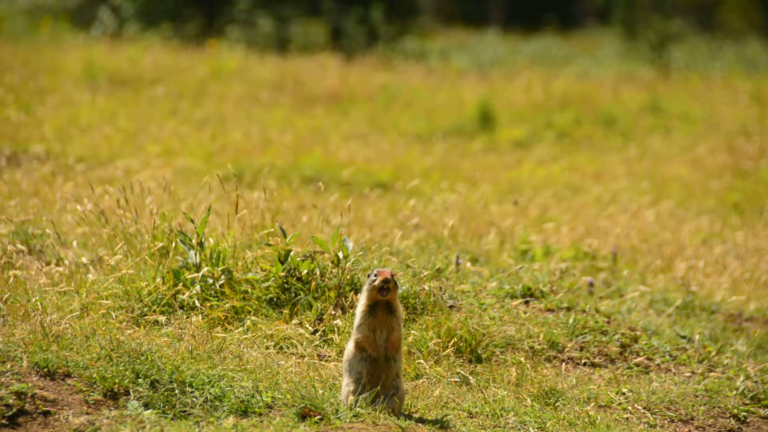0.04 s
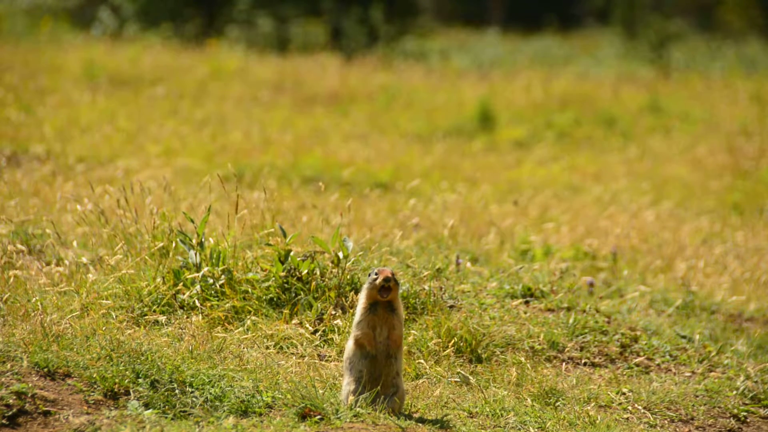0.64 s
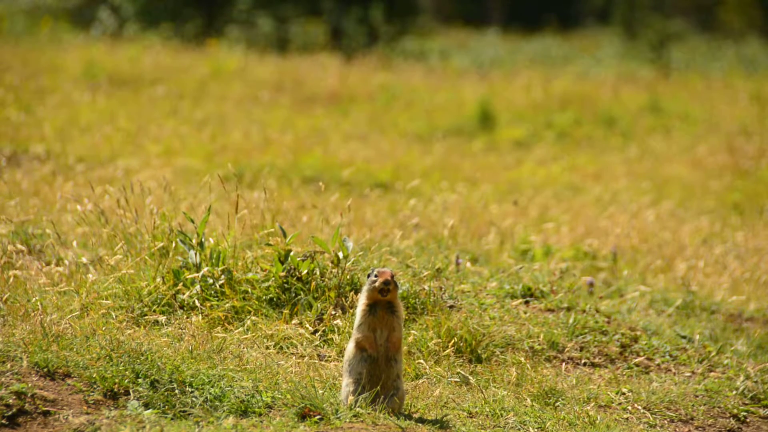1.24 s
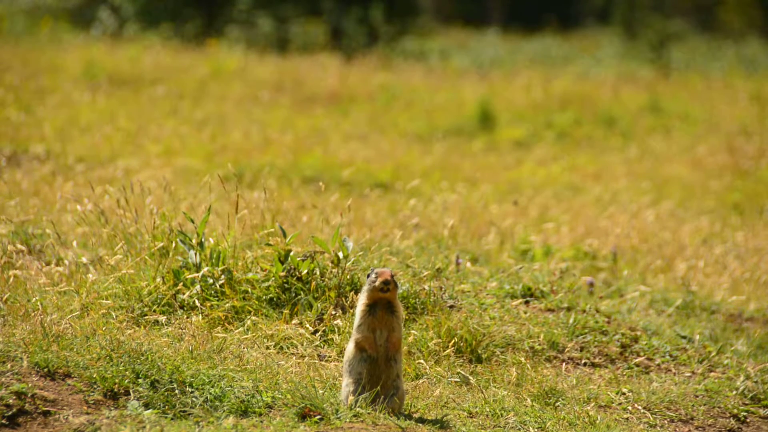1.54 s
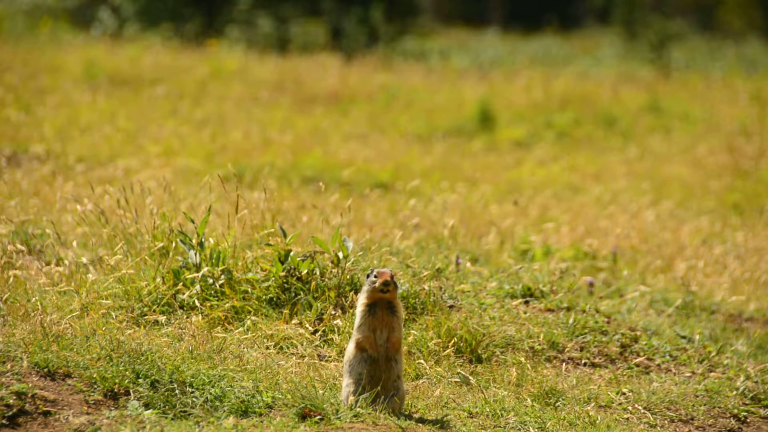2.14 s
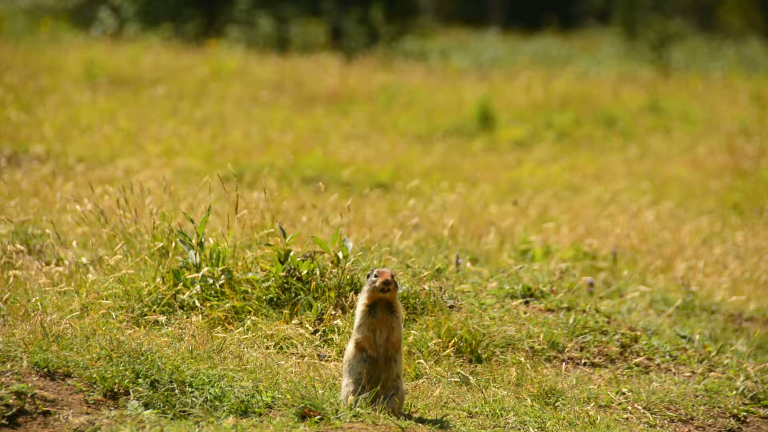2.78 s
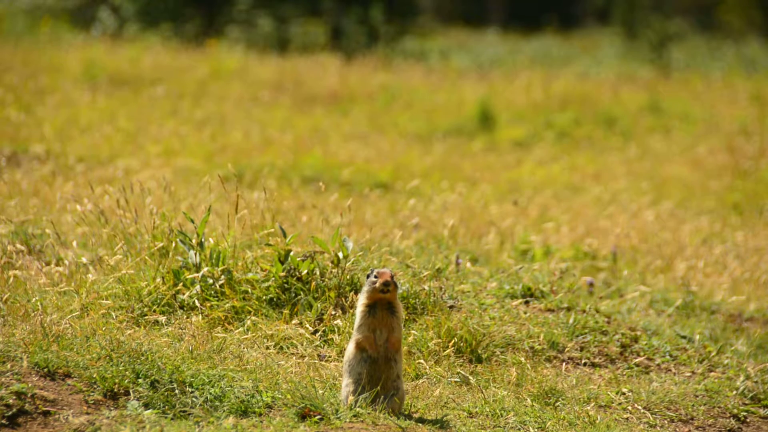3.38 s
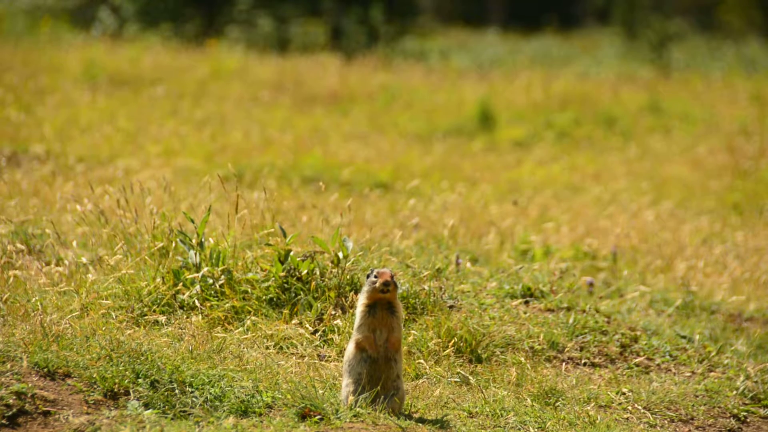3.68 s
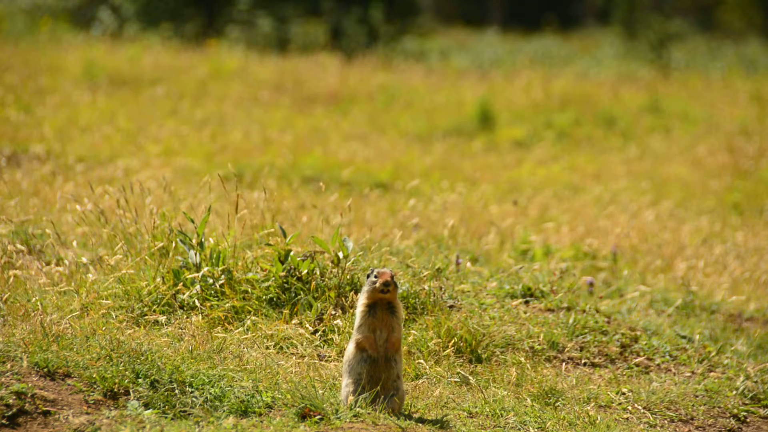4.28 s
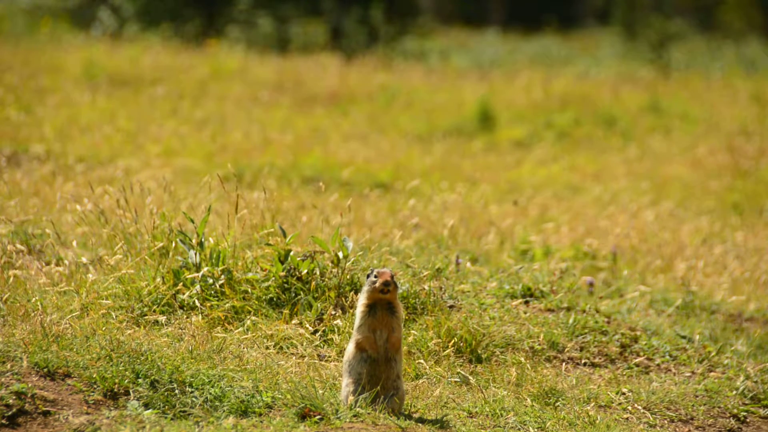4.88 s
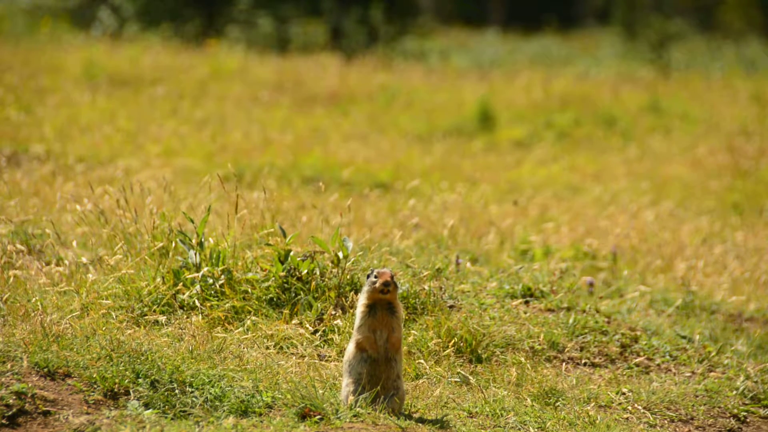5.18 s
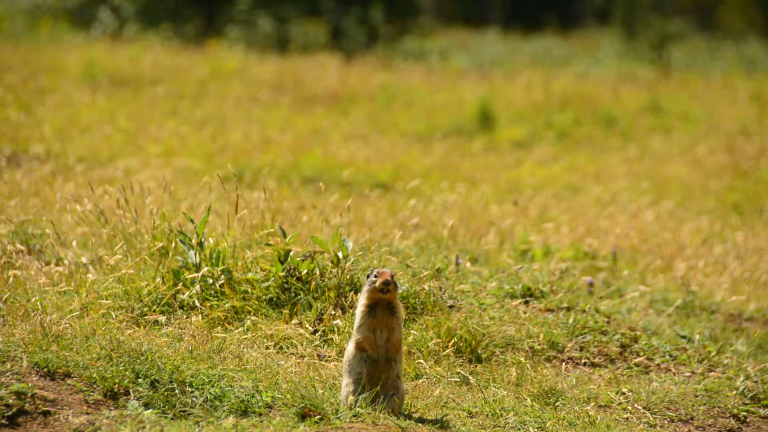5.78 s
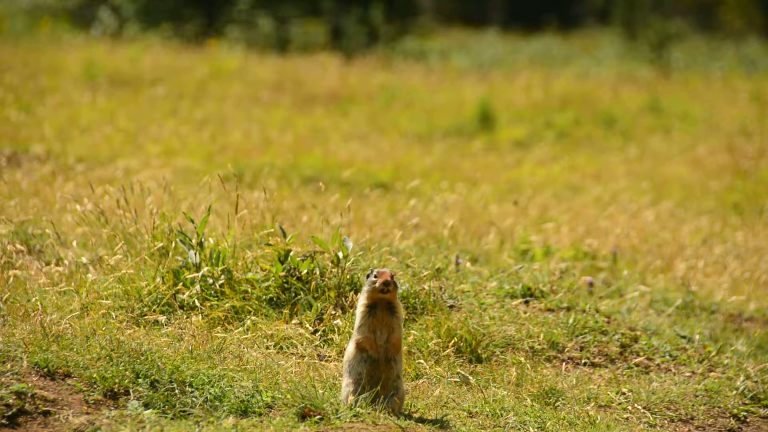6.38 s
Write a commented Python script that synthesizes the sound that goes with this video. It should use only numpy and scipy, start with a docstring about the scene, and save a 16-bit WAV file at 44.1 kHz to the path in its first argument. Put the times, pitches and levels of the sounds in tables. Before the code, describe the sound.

A ground squirrel gives six sharp, high alarm chirps from straight ahead in an open meadow, each a tiny falling whistle with a brief outdoor echo. Three come in quick succession, then three more after longer pauses. Between them are a small dry snap, faint grass rustles, soft microphone bumps and a light woody knock. Distant trees rush quietly underneath, with a thin electronic whine.

```python
"""Six sharp alarm chirps from a ground squirrel ring out over a meadow. Each is an arched whistle that
plunges at the end; near the crest a brief second whistle joins and couples with it. Grass and bushes
scatter the chirps and the forest edge answers, duller as the air soaks up the treble.
Behind them sit a dry snap, a woody knock, faint rustles, soft microphone bumps, brushed grass and a
far peep, on a bed of distant trees and the thin whine of camera electronics."""
import sys
import numpy as np
from scipy import signal
from scipy.fft import rfft, irfft, next_fast_len
from scipy.io import wavfile
from scipy.ndimage import map_coordinates

SR = 44100
rng = np.random.default_rng(int(sys.argv[2]) if len(sys.argv) > 2 else 0)


def put_to_file(sound):
    """Save the sound as 16-bit audio at rate SR, in the file named by the first command-line argument."""
    columns = np.atleast_2d(sound).T  # one column per channel
    safe = np.clip(columns, -1, 1)
    whole_steps = np.round(safe * 32767)
    wavfile.write(sys.argv[1], SR, whole_steps.astype(np.int16))


N = 283563

# The alarm calls. Each row: start in seconds, length in seconds, crest pitch in Hz, then trims in dB
# for the whole chirp, the second harmonic, the third harmonic and the second whistle.
CHIRPS = [(0.0552, 0.058, 4672, 1, 2, 0, -0.5), (0.718, 0.063, 4620, -0.5, 1, -0.5, -1),
          (1.3903, 0.061, 4617, 0, 0.5, 0.5, -0.5), (2.5699, 0.06, 4618, 0.5, -0.5, -0.5, 0),
          (4.5307, 0.0615, 4656, 0, -1.5, 1.5, -6), (5.631, 0.06, 4646, 0, -2, 0.5, -4)]
# Throat and mouth resonances that the harmonics sweep through. Each row: frequency in Hz, gain in dB.
THROAT = [(2700, -36.5), (3400, -37.5), (3950, -17.5), (4300, -15), (4650, -18.5), (5500, -40),
          (6800, -21.5), (7900, -34), (8950, -25), (9300, -27), (10400, -50.5), (11500, -35.5),
          (12700, -34), (14000, -38)]
# Tones from the two whistles coupling. Each row: multiple of the first pitch, multiple of the second.
COUPLING_TONES = [(1, 1), (0, 2), (-1, 2), (3, -1), (4, -1)]
# Each entry: level of one coupling tone in dB, relative to the second whistle.
COUPLING_DB = [-11.5, -12.5, -19.5, -21, -17.5]
# Bushes and tufts that throw the chirps back. Each row: delay in seconds, spread in seconds,
# relative level in dB, lean to the left in dB.
BUSHES = [(.0062, .003, -18, -1), (.0278, .0014, -17, -4.5), (.031, .005, -18.5, -4), (.041, .002, -23, 0)]
# EQ on the meadow's reflections. Each row: frequency in Hz, gain in dB.
ECHO_COLOUR = [(2500, 10.5), (4500, 4.5), (6500, -1.5), (9200, 4), (13000, -2)]
# Stereo image of the reflections. Each row: frequency in Hz, left-right likeness (1 is mono).
ECHO_LIKENESS = [(2000, 1), (4300, 0.7), (9000, -.1), (14000, 0.025)]
# The snap's bright resonance. Each row: frequency in Hz, relative level in dB.
SNAP_COLOUR = [(150, -51), (300, -34), (500, -19), (1200, -23), (2300, -19.5), (2900, -28), (4300, -14),
               (5200, -13.5), (6100, -2.5), (7300, -24.5), (9300, -25), (10600, -17.5), (12500, -33),
               (15000, -45)]
# Scuffs and ticks. Each row: start in seconds, time to fall 60 dB in seconds, then the relative
# levels of the low, middle and high band in dB.
RUSTLES = [(2.279, .035, -62, -47, -62), (2.929, 0.042, -55, -47, -74.5), (3.623, .025, -61, -41, -48),
           (3.636, .2, -52.5, -51, -60), (4.764, .14, -44, -52.5, -57.5), (4.851, .14, -56, -42, -55.5),
           (4.858, .06, -52, -47, -63), (5.1532, .014, -58, -52, -43.5), (5.166, .1, -50, -57, -51.5),
           (5.249, .3, -54, -62, -60), (5.397, .03, -64, -50, -54.5), (5.549, 0.044, -53, -51, -56.5),
           (6.103, 0.027, -67, -45.5, -56), (6.133, 0.037, -57, -47, -47.5)]
# Colours of the low, middle and high rustle band. Each point: frequency in Hz, relative level in dB.
RUSTLE_BANDS = [
    [(80, -27), (300, -11), (700, -5.5), (1500, -27), (5000, -57)],
    [(400, -41), (1100, -4), (2600, 5), (4500, -10), (12000, -42)],
    [(2000, -25), (5000, 0), (11000, -5.5), (15000, -12.5)],
]
# Microphone bumps. Each row: centre in seconds, half length in seconds, level in dB,
# lower edge in Hz, upper edge in Hz.
BUMPS = [(2.113, 0.036, -66.5, 64, 140), (2.23, 0.02, -68, 65, 138), (2.52, .03, -60, 140, 450),
         (3.14, 0.11, -66, 55, 139.6), (3.196, 0.017, -52.5, 60, 151), (3.559, 0.0346, -52, 125, 360),
         (3.67, 0.064, -59.5, 110, 520), (4.828, 0.0062, -50.5, 190, 600)]
# Brushed grass. Each row: centre in seconds, half length in seconds, level in dB.
SWISHES = [(2.62, .04, -54), (3.619, .06, -57), (5.29, .04, -65.5), (5.847, .06, -63), (6.34, .05, -58)]
# The rush of distant trees. Each row: frequency in Hz, relative level in dB.
TREE_COLOUR = [(15, -59.5), (25, -33.5), (86, -16), (175, -11), (297, -5.5), (689, -2), (851, -4),
               (1200, -4.5), (1780, -7), (2500, -11.5), (3170, -13), (4020, -15), (4710, -16.5),
               (6460, -18), (13500, -20)]
# Open-air stereo image, widest in the treble. Each row: frequency in Hz, left-right likeness.
AIR_LIKENESS = [(60, .55), (150, 0.72), (400, .94), (1000, 0.89), (2400, .62), (6000, .2), (14000, .1)]
# The whine's fader, steady until it wavers near the end. Each row: time in seconds, then the relative
# left and right levels in dB.
WHINE_LEVELS = [(5.0, -48, -44.5), (5.4, -46, -45), (5.7, -46.8, -46), (6.0, -51, -44), (6.3, -51.5, -47)]
# Hiss around the whine. Each row: frequency in Hz, relative level in dB.
FIZZ_COLOUR = [(14800, -60), (14980, -6), (15250, -1), (15500, 0), (15720, -8), (15800, -60)]


def squirrel():
    """The alarm chirps come from straight ahead and ring through the meadow."""
    track = np.zeros((2, N))
    for start, *shape in CHIRPS:
        add(track, start, meadow(chirp(*shape), BUSHES, echo_db=-16))
    return track


def chirp(length, crest_hz, db, second_db, third_db, whistle_db, jitter=.003, break_up=.023,
          brighten=.4, rasp_db=-32, flutter_db=1.6, attack_s=.0036, release_s=.002):
    """Three harmonics arch through the throat's resonances, with a second whistle and a little rasp."""
    n = int(length * SR)
    t = np.arange(n) / SR
    progress = t / length
    unsteady = jitter + break_up * progress ** 10  # the voice loses its grip in the final plunge
    pitch = crest_hz * pitch_arch(progress)
    phase = 2 * np.pi * np.cumsum(pitch * (1 + unsteady * wobble(890, n))) / SR
    push_db = effort(progress)  # higher harmonics follow it more steeply
    levels = [amp(trim_db + along(THROAT, k * pitch) + push_db * (1 + brighten * (k - 1)))
              for k, trim_db in enumerate([0, second_db, third_db], 1)]
    voice = sum(level * np.sin(k * phase) for k, level in enumerate(levels, 1))
    voice += amp(whistle_db) * second_whistle(progress, phase, jitter)
    turbulence = noise([(2000, -27.5), (5000, -10.5), (8000, 0), (14000, -7.5)], AIR_LIKENESS, n)[0]
    voice += amp(rasp_db) * levels[0] * turbulence
    gate = (1 - np.exp(-t / attack_s)) * np.clip((length - t) / release_s, 0, 1)
    flutter = flutter_db * wobble(201.6, n)
    return np.sqrt(2) * voice * gate * amp(db + flutter)


def pitch_arch(progress, crest_at=.35, rise=.095, sag=.305, plunge=.12):
    """Pitch as a share of the crest: it rises, sags and finally plunges as progress runs from 0 to 1."""
    before, after = either_side(progress, crest_at)
    return 1 - rise * before ** 2.4 - sag * after ** 2 - plunge * after ** 10


def effort(progress, peak_at=.58, build_db=4.5, fade_db=4):
    """The push behind the voice in dB: it builds, peaks and fades."""
    before, after = either_side(progress, peak_at)
    return -build_db * before - fade_db * after ** 2


def second_whistle(progress, voice_phase, jitter, centre=.43, half=.115, hz=6045, fall_hz=650, db=-31.5):
    """A brief falling whistle couples with the voice, adding sum and difference tones."""
    pitch = hz - fall_hz * (progress - centre)
    phase = 2 * np.pi * np.cumsum(pitch * (1 + jitter * wobble(730, len(progress)))) / SR
    coupled = sum(amp(level) * np.sin(a * voice_phase + b * phase)
                  for (a, b), level in zip(COUPLING_TONES, COUPLING_DB))
    return amp(db) * hump(progress, centre, half) * (np.sin(phase) + coupled)


def meadow(x, bushes=(), echo_db=-40, echo_s=.0272, treble_loss=34):
    """The dry sound plus one clear echo, clustered reflections and a tail that dulls as it travels."""
    t = np.arange(int(.6 * SR)) / SR
    power = scatter(t) * pan(-1.2) ** 2 / SR
    for delay, spread, db, lean_db in bushes:
        cluster = hump(t, delay, spread)
        power += (amp(db) * pan(lean_db)) ** 2 * cluster / cluster.sum()
    paths = np.sqrt(power) * noise([(1000, 0)], ECHO_LIKENESS, len(t))
    paths[:, round(echo_s * SR)] += amp(echo_db) * pan(-3)[:, 0]
    hz, age, spectra = signal.stft(paths, SR, nperseg=256)
    absorbed_db = treble_loss * age * np.maximum((hz[:, None] / 6000) ** 2 - .6, 0)  # air soaks up treble
    spectra *= amp(along(ECHO_COLOUR, hz)[:, None] - absorbed_db)
    response = signal.istft(spectra, SR, nperseg=256)[1]
    response[:, 0] += 1  # the direct sound
    return signal.fftconvolve(x[None], response, axes=1)


def scatter(t, grass_hold_s=.033, grass_t60=.19, forest_peak_s=.14, forest_peak_db=-15):
    """Power that comes back per second at delay t: first from the grass, then from the forest edge."""
    grass_db = -60 * np.maximum(t - grass_hold_s, 0) / grass_t60
    decades = np.log10((t + 1 / SR) / forest_peak_s)
    forest_db = forest_peak_db + np.minimum(39.5 * decades, -53 * decades)  # swells, then dies away
    return amp(grass_db) ** 2 + amp(forest_db) ** 2


def snap(start=1.8524, db=-29, attack_s=.0006, hold_s=.0051, t60=.013, wet=.7):
    """A dry snap: a few milliseconds of crackle with a bright resonance."""
    track, t = np.zeros((2, N)), np.arange(SR // 20) / SR
    envelope = np.clip(t / attack_s, 0, 1) * amp(db - 60 * np.maximum(t - hold_s, 0) / t60)
    burst = envelope * noise(SNAP_COLOUR, AIR_LIKENESS, len(t))[0]
    add(track, start, wet * meadow(burst))
    add(track, start, (1 - wet) * burst)
    return track


def knock(start=4.857, hz=1138, t60=.03, db=-38):
    """A light woody knock: one short mode of a dry stick."""
    track, t = np.zeros((2, N)), np.arange(SR // 10) / SR
    add(track, start, amp(db - 60 * t / t60) * np.sin(2 * np.pi * hz * t))
    return track


def rustles(grain_db=2, trim_db=-1.5):
    """Small scuffs and ticks close by: three bands of noise with a grainy decay."""
    track, t = np.zeros((2, N)), np.arange(SR // 4) / SR
    for start, t60, *levels in RUSTLES:
        scuff = sum(amp(level) * noise(band, [(1000, .96)], len(t))
                    for level, band in zip(levels, RUSTLE_BANDS))
        grain = grain_db * wobble(400, len(t))
        add(track, start, scuff * amp(trim_db - 60 * t / t60 + grain))
    return track


def bumps():
    """Soft bumps on the microphone: short swells of low noise."""
    track = np.zeros((2, N))
    for centre, half, db, low_hz, top_hz in BUMPS:
        colour = [(low_hz / 3, -20), (low_hz, 0), (top_hz, 0), (2 * top_hz, -15), (8 * top_hz, -50)]
        start, envelope = swell(centre, half, db)
        add(track, start, envelope * noise(colour, [(60, .5), (250, 1)], len(envelope)))
    return track


def swishes():
    """Brushed grass: bright noise that rises and fades."""
    track = np.zeros((2, N))
    colour = [(300, -17), (2000, 3), (5000, -1), (13000, -6)]
    for centre, half, db in SWISHES:
        start, envelope = swell(centre, half, db)
        add(track, start, envelope * noise(colour, AIR_LIKENESS, len(envelope)))
    return track


def peep(centre_s=4.079, half_s=.016, hz=3220, db=-59):
    """One faint, wavering peep far off in the meadow."""
    track = np.zeros((2, N))
    start, envelope = swell(centre_s, half_s, db)
    t = np.arange(len(envelope)) / SR
    tone = np.sin(2 * np.pi * hz * t + wobble(300, len(t)))
    add(track, start, meadow(envelope * tone))
    return track


def distant_trees(db=-55.5, sway_db=.43, lean_db=-1):
    """The steady rush of distant trees, barely swaying in level."""
    return noise(TREE_COLOUR, AIR_LIKENESS, N) * amp(db + sway_db * wobble(6, N)) * pan(lean_db)


def whine(hz=15634.6, trim_db=2, side_hz=15219, side_db=-72, fizz_db=-61):
    """Camera electronics: a thin tone and a weak one just below it, on a narrow band of hiss."""
    t = np.arange(N) / SR
    lag = 2.45 - 1.6 * hump(t, 5.25, .06)  # radians between the channels; they briefly draw closer
    tone = amp(curves(WHINE_LEVELS, t)) * np.sin(2 * np.pi * hz * t + np.array([-lag, lag]) / 2)
    side_tone = amp(side_db) * np.sin(2 * np.pi * side_hz * t + wobble(40, N))
    fizz = amp(fizz_db) * noise(FIZZ_COLOUR, [(15000, .7)], N)
    return np.sqrt(2) * (amp(trim_db) * tone + side_tone) + fizz


def amp(db):
    """Decibels to gain."""
    return 10 ** (np.asarray(db) / 20)


def pan(lean_db):
    """Left and right gains; a positive lean favours the left."""
    return amp([[lean_db / 2], [-lean_db / 2]])


def hump(at, centre, half):
    """A bell of height 1 around centre."""
    return np.exp(-((at - centre) / half) ** 2)


def swell(centre, half, db):
    """Start time and envelope of a bell-shaped fade that peaks at centre seconds."""
    t = np.arange(SR // 2) / SR
    middle = t[-1] / 2
    return centre - middle, amp(db) * hump(t, middle, half)


def either_side(progress, peak):
    """Two ramps: from 1 to 0 before the peak, and from 0 to 1 after it."""
    return np.maximum(1 - progress / peak, 0), np.maximum(progress - peak, 0) / (1 - peak)


def along(points, hz):
    """Read a curve of (Hz, value) points on a log frequency axis."""
    freqs, values = np.transpose(points)
    return np.interp(np.log(hz + 1), np.log(freqs + 1), values)


def curves(rows, at):
    """Automation lanes: each column after the time, joined by straight lines."""
    times, *lanes = np.transpose(rows)
    return [np.interp(at, times, lane) for lane in lanes]


def wobble(rate, size):
    """A smooth random curve, rate knots a second."""
    knots = rng.standard_normal(int(size * rate / SR) + 4)
    return map_coordinates(knots, [np.arange(size) * rate / SR])


def filtered(x, response):
    """EQ x with a gain that is a function of frequency."""
    n = x.shape[-1]
    padded = next_fast_len(n + 8192)
    return irfft(rfft(x, padded) * response(np.fft.rfftfreq(padded, 1 / SR)), padded)[..., :n]


def noise(colour, likeness, size):
    """Stereo noise of rms 1 with a given colour and left-right likeness."""
    def mid_side_gains(hz):
        width = np.arccos(np.clip(along(likeness, hz), -1, 1)) / 2
        return amp(along(colour, hz)) * [np.cos(width), np.sin(width)]
    mid, side = filtered(rng.standard_normal((2, size)), mid_side_gains)
    stereo = np.array([mid + side, mid - side])
    return stereo / np.sqrt(np.mean(stereo ** 2) + 1e-20)


def add(track, start, sound):
    """Mix a sound into the track at start seconds."""
    part = track[:, round(start * SR):][:, :sound.shape[-1]]
    part += sound[..., :part.shape[1]]


def scene():
    """The squirrel up front, small sounds around it, trees and whine underneath."""
    calls = squirrel()
    small_sounds = snap() + knock() + rustles() + bumps() + swishes() + peep()
    return calls + small_sounds + distant_trees() + whine()


def record(dry, top_hz=15886):
    """The camera's band limit: a brick-wall low-pass on the whole mix."""
    return filtered(dry, lambda hz: hz < top_hz)


dry = scene()
out = record(dry)
put_to_file(out)
```